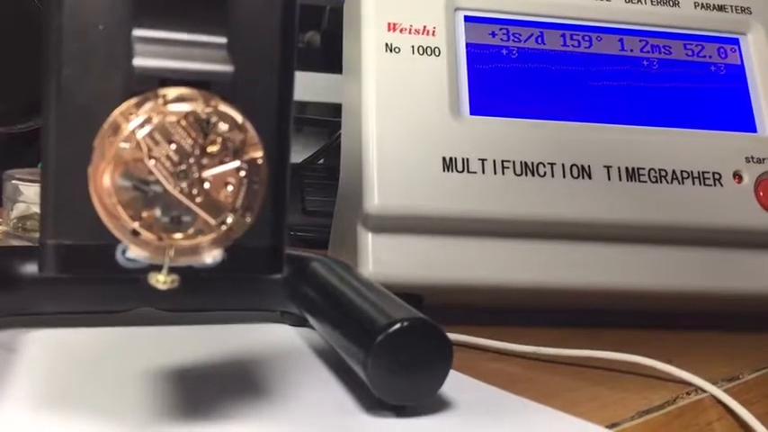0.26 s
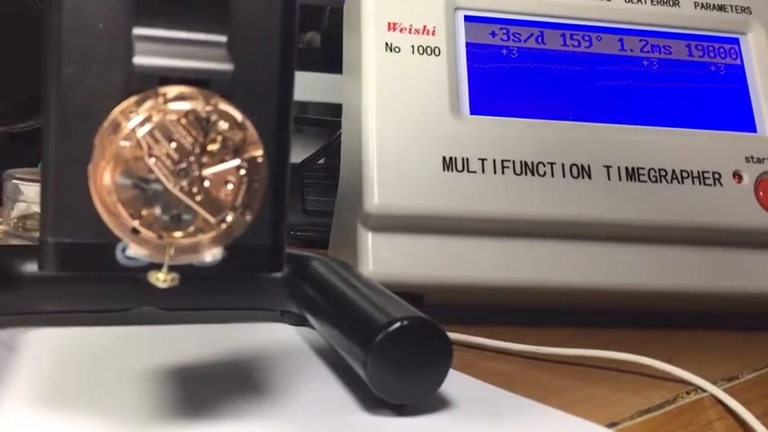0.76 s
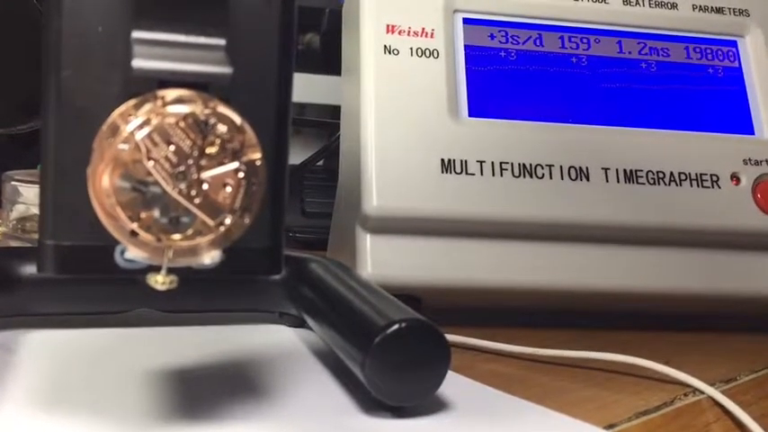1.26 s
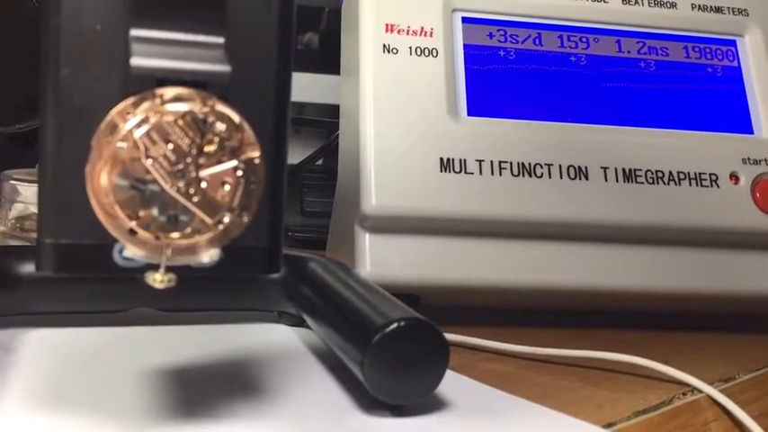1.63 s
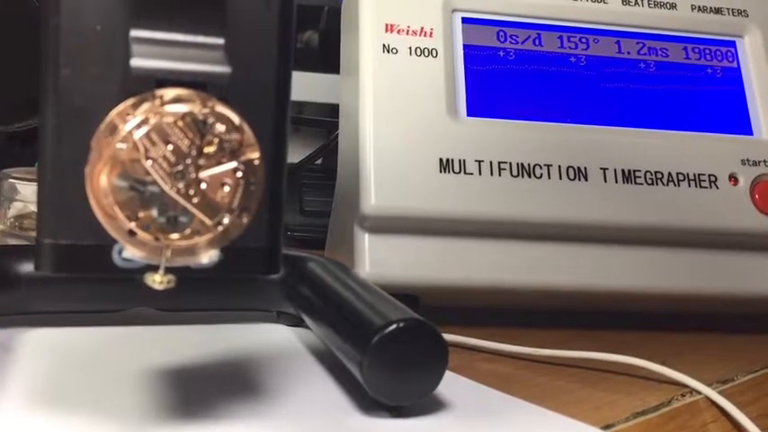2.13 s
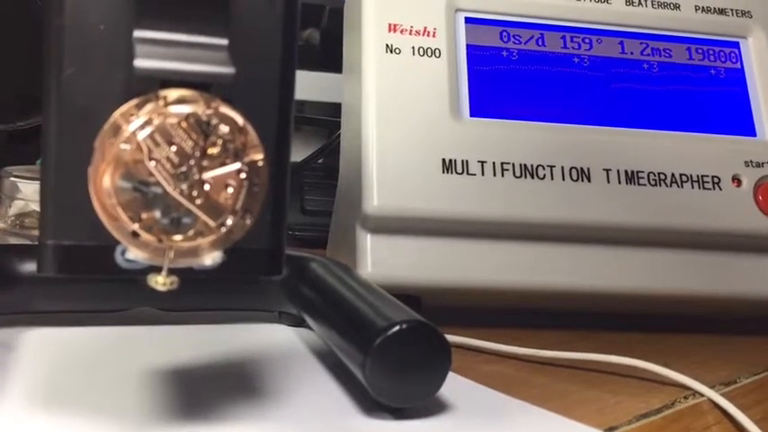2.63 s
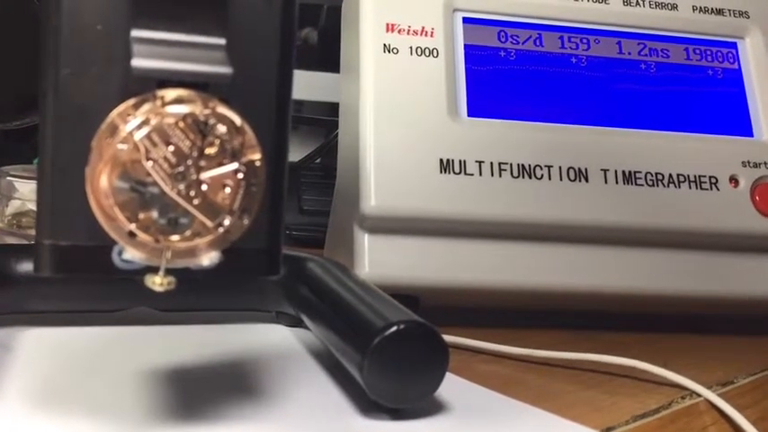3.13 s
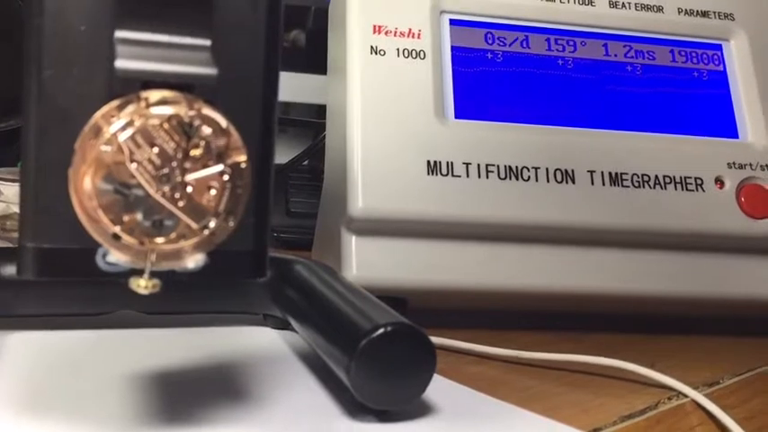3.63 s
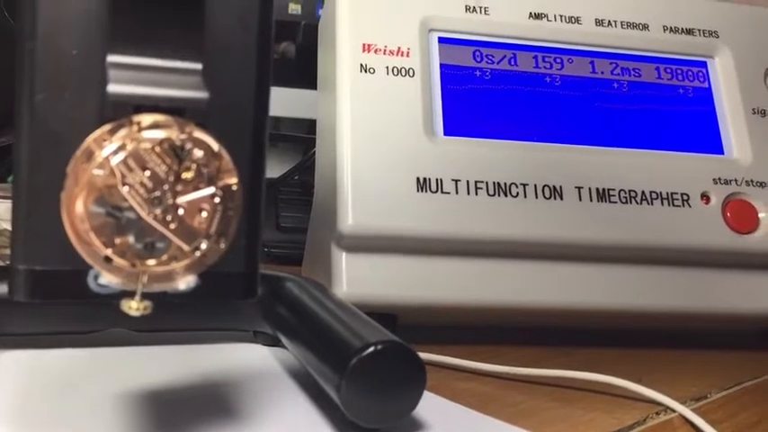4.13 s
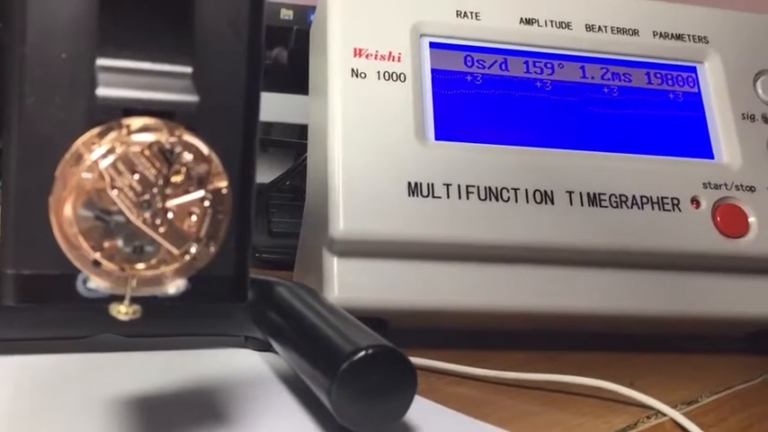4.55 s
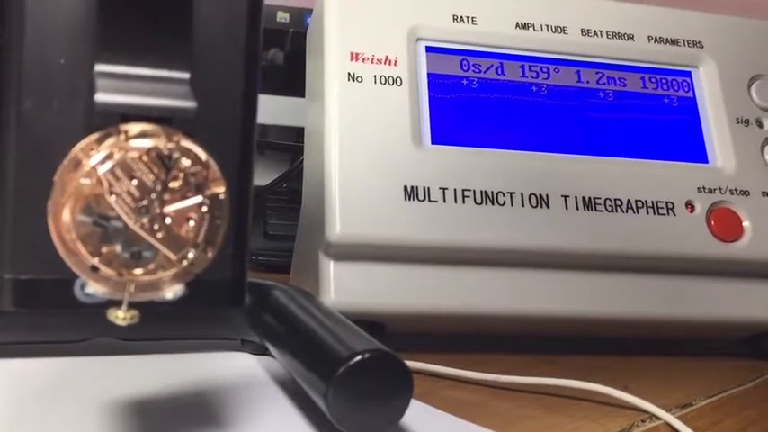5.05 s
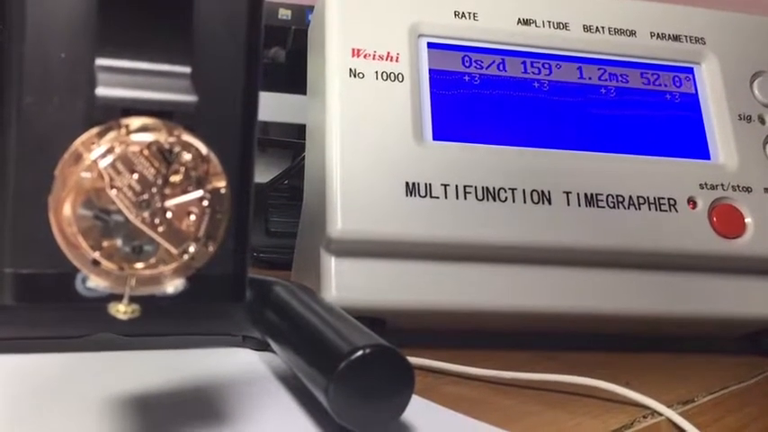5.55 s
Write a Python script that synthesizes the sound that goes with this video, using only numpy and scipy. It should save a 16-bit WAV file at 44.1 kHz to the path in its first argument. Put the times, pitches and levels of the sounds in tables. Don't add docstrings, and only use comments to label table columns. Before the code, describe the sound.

Steady fast ticking from a small metal sounder, nearly identical from beat to beat, starts at once and never pauses. The clicks are dry in attack but smeared by close reflections off case, bench and walls. The watch's own escapement is barely audible just before each one. Quiet mains hum and fan air swell gently underneath; a few soft thuds come through the bench. Phone microphone roughly a metre off.

```python
import sys
import numpy as np
from scipy import signal
from scipy.fft import rfft, irfft, next_fast_len
from scipy.io import wavfile
from scipy.ndimage import uniform_filter1d

SR = 44100
rng = np.random.default_rng(int(sys.argv[2]) if len(sys.argv) > 2 else 0)


def convert_level_to_amplitude(level_db):
    exponent = np.asarray(level_db, float) / 20
    return 10 ** exponent


def to_wav(sig):
    pcm = np.clip(np.atleast_2d(sig), -1, 1) * 32767
    pcm = np.round(pcm).astype(np.int16)
    wavfile.write(sys.argv[1], SR, pcm.T)


N = 254898

FIRST_S, BEAT_S, BEAT_ERROR_S, BEATS = .00447, .1818146, .000619, 32
HZ = np.fft.rfftfreq(2 ** 15, 1 / SR) + 1e-3
LONG_HZ = np.fft.rfftfreq(next_fast_len(N), 1 / SR) + 1e-3


def peak(hz, width_hz, grid=HZ):
    return 1 / (1 + 1j * (grid ** 2 - hz ** 2) / (grid * width_hz))


def modes(table):
    return sum(convert_level_to_amplitude(db) * peak(hz, width_hz) ** 2 for hz, width_hz, db in table)


def impulses(s, gain):
    return sum(g * np.exp(-2j * np.pi * HZ * t) for t, g in zip(s, gain))


def noise(shape):
    size = next_fast_len(N)
    white = rfft(rng.standard_normal(size))
    return irfft(white * shape * np.sqrt(SR / 2), size)[:N]


def band(hz, width_hz):
    x = noise(peak(hz, width_hz, LONG_HZ) ** 2)
    return x / x.std()


def walk(rate):
    hold = int(SR / rate)
    steps = np.repeat(rng.standard_normal(N // hold + 1), hold)
    return 1.3 * uniform_filter1d(uniform_filter1d(steps, hold), hold)[:N]


def wavering_sine(hz, drift_hz, rate):
    return 2 * np.pi * np.cumsum(hz + drift_hz * walk(rate)) / SR


def fader(table):
    return convert_level_to_amplitude(np.interp(np.arange(N) / SR, *np.transpose(table)))


# (start [s], length [s], hum level [dB], rumble level [dB])
BASS_SWELLS = [(.1, .52, -57.5, -59), (.79, .24, -57.5, -57), (1.41, .29, -55.5, -62),
               (1.76, .28, -63, -66), (2.07, .2, -57, -64), (2.5, .15, -57, -58), (2.88, .2, -68, -62),
               (3.08, .48, -57, -63), (3.8, .33, -56, -62), (4.2, .39, -54, -60), (4.68, .2, -60.5, -70),
               (5.0, .4, -55, -62), (5.5, .4, -54.5, -63)]


def swell(column, lull_db=-72, edge_s=.11):
    t = np.arange(N) / SR

    def rise(s):
        return np.clip(s / edge_s + .5, 0, 1) ** 2

    gain = convert_level_to_amplitude(lull_db)
    for row in BASS_SWELLS:
        start, length = row[:2]
        gain = gain + convert_level_to_amplitude(row[column]) * rise(t - start) * rise(start + length - t)
    return gain


def mains_hum():
    turn = wavering_sine(99.9, 1.2, 3)
    mains = np.sin(turn) + convert_level_to_amplitude(-10) * np.sin(2 * turn)
    return np.sqrt(2) * swell(2) * convert_level_to_amplitude(1.1 * walk(8)) * mains


def rumble():
    return band(54, 27) * swell(3) * convert_level_to_amplitude(1.5 * walk(10))


# (frequency [Hz], width [Hz], level [dB])
DUCT_TONES = [(141, 27, -67.5), (198.4, 11, -71.5), (229.8, 13, -65.5), (276.4, 9, -68.5), (353, 8.3, -85),
              (508, 40, -78), (915, 8, -89)]


def duct():
    duct_db = -57.3 + 1.3 * walk(11)
    tones = sum(band(hz, width_hz) * convert_level_to_amplitude(db) for hz, width_hz, db in DUCT_TONES)
    puffs = band(188, 240) * convert_level_to_amplitude(-9 + duct_db + 2.5 * walk(14))
    return tones * convert_level_to_amplitude(1.2 * (duct_db + 58.5)) + puffs


# (time [s], level [dB])
RISING_WHINE = [(0, -101.5), (4.1, -96), (4.5, -79), (5.78, -73)]
# (time [s], level [dB])
DYING_WHINE = [(0, -84), (1.5, -86), (2.6, -95), (5.78, -100)]


def motors():
    rising = np.sin(wavering_sine(975, 1.5, 4)) * fader(RISING_WHINE)
    dying = band(895, 14) * fader(DYING_WHINE)
    fan = convert_level_to_amplitude(-69.0 + 0.74 * walk(5.4)) * np.sin(wavering_sine(491.5, .7, 9))
    return rising + dying + fan


# (frequency [Hz], level [dB per Hz])
AIR_SPECTRUM = [(30, -115), (60, -94.5), (160, -90.5), (250, -79), (320, -95.5), (420, -99), (1000, -101),
                (1600, -103), (3200, -107), (6300, -114), (9700, -117.5), (10500, -123), (11300, -119.5),
                (15500, -119)]


def air():
    hz, db = np.transpose(AIR_SPECTRUM)
    return noise(convert_level_to_amplitude(np.interp(np.log(LONG_HZ), np.log(hz), db)))


def workshop():
    return mains_hum() + rumble() + duct() + motors() + air()


def beat_times(k):
    return FIRST_S + k * BEAT_S + BEAT_ERROR_S * (-1.) ** k


def beat_train(lead_s, scatter_db):
    k = np.arange(BEATS + 2)
    s = np.maximum(beat_times(k) - lead_s, 0)
    beats = np.zeros(N + SR)
    beats[np.round(s * SR).astype(int)] = convert_level_to_amplitude(scatter_db * rng.standard_normal(len(k)))
    return beats


def play(beats, click):
    before = round(2 * BEAT_S * SR)
    return signal.oaconvolve(beats, irfft(click))[before:before + N]


def smear():
    rise = np.exp(np.linspace(-2.2, 0, round(0.032 * SR)))
    gate = play(beat_train(0.02, 1.8), rfft(rise, 2 * len(HZ) - 2))
    return gate * (convert_level_to_amplitude(-56.5) * band(2400, 750) + convert_level_to_amplitude(-60) * band(4600, 700) + convert_level_to_amplitude(-77.5) * band(5800, 1500))


def room(db, t60, early_db, early_t60, hz, width_hz, start_s=0.014, rise_s=0.0089):
    t = np.arange(SR // 2) / SR
    fade = convert_level_to_amplitude(db - 60 * t / t60) + convert_level_to_amplitude(early_db - 60 * t / early_t60)
    echoes = rng.standard_normal(len(t)) * fade * np.clip((t - start_s) / rise_s, 0, 1)
    return rfft(echoes, 2 * len(HZ) - 2) * peak(hz, width_hz)


def paths(table):
    ms, db = np.transpose(table)
    return impulses(ms / 1000, convert_level_to_amplitude(db))


def tone(hz, width_hz, case_hz, case_width_hz, low_hz, high_hz, count):
    drive_hz = 2320
    burst = impulses(np.arange(count) / drive_hz, np.ones(count))
    edges = 1 / (1 + (low_hz / HZ) ** 12) / (1 + (HZ / high_hz) ** 12)
    return burst * peak(hz, width_hz) * peak(case_hz, case_width_hz) ** 2 * edges


# (resonance [Hz], width [Hz], housing [Hz], housing width [Hz], low edge [Hz], high edge [Hz])
DISC_TONE = (2327, 418, 2390, 1730, 1528, 4060)
# (delay [ms], level [dB])
DISC_ARRIVALS = [(3.39, -5.2), (5.539, 2.0), (7.33, -5.5), (8.895, -11.3), (9.79, -6.6), (10.754, -15.6),
                 (11.542, -10.1), (12.67, -17.4), (14.116, -10.9)]
# (level [dB], t60 [s], early level [dB], early t60 [s], narrowing [Hz], width [Hz])
DISC_TAIL = (-49.5, 0.38, -50, 0.15, 2246.5, 351.5)


def disc():
    return tone(*DISC_TONE, count=4) * (paths(DISC_ARRIVALS) + room(*DISC_TAIL))


# (resonance [Hz], width [Hz], housing [Hz], housing width [Hz], low edge [Hz], high edge [Hz])
CAVITY_TONE = (4582, 515, 4334, 2000, 2960, 5620)
# (delay [ms], level [dB])
CAVITY_ARRIVALS = [(4.824, -2.3), (5.074, -16.9), (5.845, -11.5), (6.332, 0.1), (6.814, -20.9),
                   (7.619, -7.7), (10.567, -17.6), (13.118, -20.8), (15.266, -19.4), (17.602, -21.3)]
# (level [dB], t60 [s], early level [dB], early t60 [s], narrowing [Hz], width [Hz])
CAVITY_TAIL = (-47, .5, -47.5, 0.06, 4619.5, 199)


def cavity():
    return tone(*CAVITY_TONE, count=3) * (paths(CAVITY_ARRIVALS) + room(*CAVITY_TAIL))


# (frequency [Hz], width [Hz], level [dB])
DISC_OVERTONES = [(1960, 200, -11.5), (3692, 284, -9), (6875, 580, -22.5), (7460, 130, -29),
                  (9120, 540, -27.5), (11250, 240, -25), (11780, 320, -22.5), (12500, 380, -41),
                  (13800, 770, -35.5), (15100, 540, -45.5)]
# (level [dB], t60 [s], early level [dB], early t60 [s], narrowing [Hz], width [Hz])
OVERTONE_TAIL = (-44, .2, -23, 0.0132, 9995, 14007)


def overtones():
    arrivals = convert_level_to_amplitude(-2) * paths(CAVITY_ARRIVALS) + impulses([.0039], [convert_level_to_amplitude(-4.5)])
    return modes(DISC_OVERTONES) * (arrivals + room(*OVERTONE_TAIL, start_s=0.002, rise_s=0.0014))


# (frequency [Hz], width [Hz], level [dB])
CASE_PANELS = [(2943, 115, -2.5), (3114, 43, -12.5), (5560, 130, -23.5)]


def case():
    return impulses([.0055], [1]) * modes(CASE_PANELS)


# (level [dB], t60 [s], early level [dB], early t60 [s], frequency [Hz], width [Hz])
STRAND_TAIL = (-34.5, 0.41, -37, 0.04, 2087.5, 111)


def strand():
    return room(*STRAND_TAIL) * peak(*STRAND_TAIL[-2:])


DISC_ECHOES = [24.354, 30.329, 34.206, 39.252, 60.397, 76.429, 97.347, 102.132, 109.875, 115.918, 120.215,
               154.456]
CAVITY_ECHOES = [28.152, 34.286, 47.018, 52.971, 60.147, 64.535, 71.633, 80.454, 99.807, 116.406, 129.615,
                 150.431, 156.361]
STRAND_ECHOES = [16.825, 22.528, 38.98, 51.633, 97.12, 111.361, 125.147, 132.914, 142.12]
SIDE_ECHOES = [30.941, 55.011, 83.061]
ECHO_PITCHES = (2340, 4620, 2080, 2200)
# (level at the start [dB], loss [dB per ms])
ECHO_LOSSES = [(-.5, .155), (-5, .145), (-4.5, .155), (-11.5, .1)]
# (delay [ms], frequency [Hz], level [dB])
STRAY_ECHOES = [
    (17.54, 2340, -6.7),
    (19.127, 4730, -10.3),
    (43.401, 4500, -13.3),
    (71.542, 4500, -17.3),
]


def walls():
    delays = (DISC_ECHOES, CAVITY_ECHOES, STRAND_ECHOES, SIDE_ECHOES)
    echoes = list(STRAY_ECHOES)
    for hz, times, (db, loss) in zip(ECHO_PITCHES, delays, ECHO_LOSSES):
        echoes += [(ms, hz, db - loss * ms) for ms in times]
    ring_width_hz = 160
    return sum(impulses([ms / 1000], [convert_level_to_amplitude(db)]) * peak(hz, ring_width_hz) ** 2 for ms, hz, db in echoes)


def sounder():
    click = case() + strand() + convert_level_to_amplitude(0.52) * disc() + convert_level_to_amplitude(0.63) * cavity() + convert_level_to_amplitude(.5) * walls()
    body = play(beat_train(0, 0.17), click)
    return body + play(beat_train(0, 1.75), overtones())


def splash():
    decay_s = .0025
    fall = np.exp(-np.arange(SR // 50) / SR / decay_s)
    gate = play(beat_train(-.0055, 4.0), rfft(fall, 2 * len(HZ) - 2))
    return gate * (convert_level_to_amplitude(-62) * band(5550, 600) + convert_level_to_amplitude(-68) * band(7300, 1600))


# (frequency [Hz], width [Hz], level [dB])
MOVEMENT_PLATES = [(2310, 780, -5), (4700, 1200, -2), (7080, 170, 5.5), (9300, 1300, -18.5),
                   (11500, 800, -2), (13700, 900, -7), (15200, 1000, 2)]
# (time [s], level above the usual [dB])
UNEVEN_BLOWS = [(.36, 8), (.54, 5.5), (.91, -4.5), (1.27, 4.5), (1.63, 4), (1.82, -6.5), (2.0, 3.5),
                (2.54, -3.5), (2.72, 6.5), (2.91, 3), (3.27, -3.5), (3.45, 4.5), (3.63, 3.5), (3.82, 3.5),
                (4.0, -6), (5.09, -14)]


def movement():
    lead_s, usual_db, scatter_db = .0053, -72.5, 1.2
    k = np.arange(1, BEATS)
    s = beat_times(k) - lead_s
    db = usual_db + scatter_db * rng.standard_normal(len(k))
    db = db + sum(odd_db * (abs(s - when) < BEAT_S / 2) for when, odd_db in UNEVEN_BLOWS)
    at = np.round(s * SR).astype(int)
    blows = np.zeros(N)
    blows[at] = convert_level_to_amplitude(db + 21.5)
    blows[at - round(.012 * SR)] = convert_level_to_amplitude(db + 5.5)
    scrape = signal.lfilter([1], [1, -.98], blows)
    rattle = convert_level_to_amplitude(-13.5) * signal.lfilter([1], [1, -.997], blows)
    grip = (scrape + rattle) * rng.standard_normal(N)
    return signal.oaconvolve(grip, irfft(modes(MOVEMENT_PLATES)))[:N]


# (time [s], level [dB], pitch [Hz])
BENCH_BUMPS = [
    (.36, -59, 330),
    (.54, -61, 400),
    (.63, -55, 130),
    (1.1, -57, 160),
    (1.15, -64, 450),
    (2.6, -60, 150),
    (4.19, -51, 150),
    (4.97, -57, 190),
    (5.42, -56, 150),
]


def bumps():
    t = np.arange(N) / SR
    length_s = .022
    return sum(convert_level_to_amplitude(db) * np.exp(-((t - s) / length_s) ** 2) * band(hz, .8 * hz) for s, db, hz in BENCH_BUMPS)


def scene():
    return (workshop() + sounder() + splash() + movement() + bumps())[None]


# (time [s], length [s])
EMPTY_MOMENTS = [(0.582, 0.008), (0.776, 0.051), (1.674, 0.012), (1.873, 0.023), (2.062, 0.016),
                 (2.398, 0.01), (2.75, 0.075), (2.952, 0.015), (3.485, 0.035), (3.67, 0.009),
                 (3.848, 0.019), (4.051, 0.027), (4.206, 0.057), (4.403, 0.047), (4.762, 0.058),
                 (5.118, 0.048), (5.29, 0.012)]


def dropouts(x):
    t = np.arange(N) / SR
    empty = sum((t > s - .008) & (t < s + length + .008) for s, length in EMPTY_MOMENTS)
    masked = signal.sosfiltfilt(signal.butter(4, [5100, 6500], "band", fs=SR, output="sos"), x)
    depth = np.clip(.9 + .1 * walk(60), 0, 1)
    return x - depth * uniform_filter1d(1. * empty, size=500) * masked


def band_limit(x):
    return signal.sosfilt(signal.butter(12, 16130, fs=SR, output="sos"), x)


def record(dry):
    top_hz = 15650
    low_pass = signal.ellip(10, .2, 70, top_hz, fs=SR, output="sos")
    mix = dropouts(signal.sosfilt(low_pass, dry + smear()))
    return band_limit(mix)


dry = scene()
out = record(dry)
to_wav(out)
```